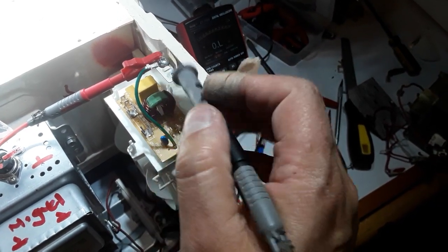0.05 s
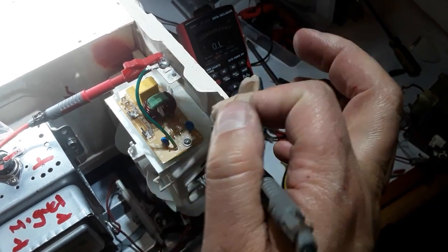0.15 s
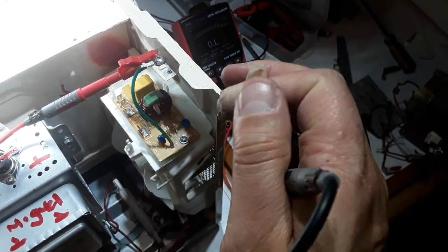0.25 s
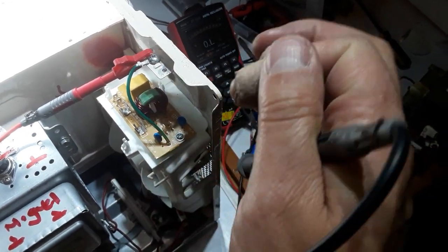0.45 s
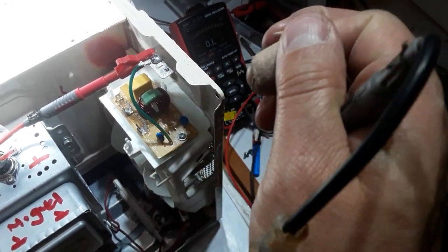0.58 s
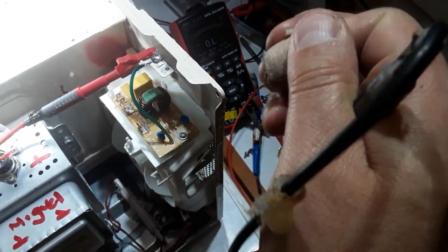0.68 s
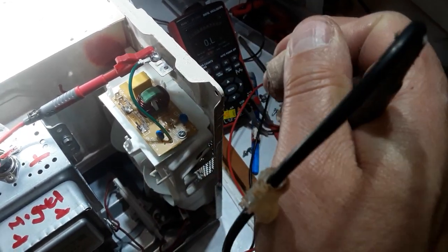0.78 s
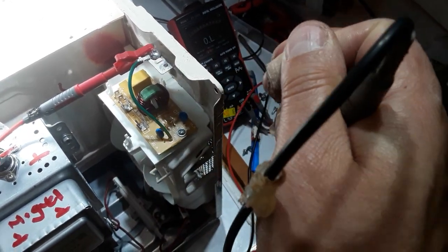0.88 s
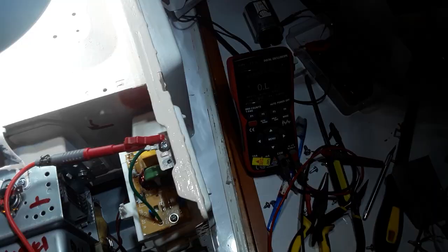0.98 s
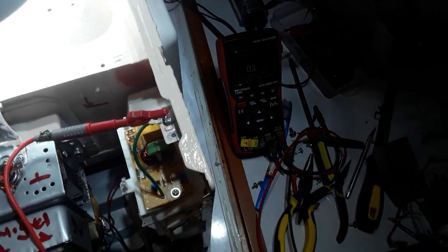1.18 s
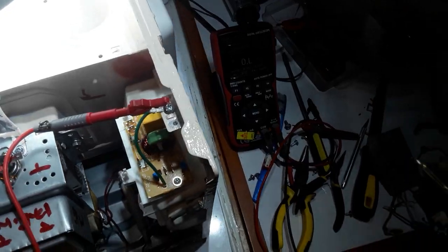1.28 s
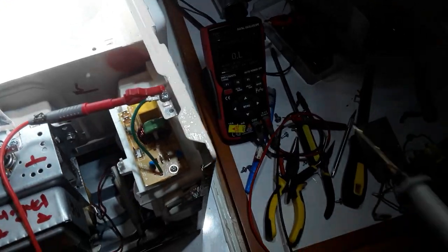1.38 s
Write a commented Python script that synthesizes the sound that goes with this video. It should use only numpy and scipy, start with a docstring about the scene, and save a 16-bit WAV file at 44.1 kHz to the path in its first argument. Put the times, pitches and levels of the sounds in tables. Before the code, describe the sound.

One sharp electrical snap with a short metallic ring, then faint handling of a lead.

```python
"""A workbench in a small room, one microphone close to an opened appliance.
One sharp electrical snap jolts the chassis and sets the sheet-metal cabinet ringing; the room's
reflections die away behind it. Then a hand draws a test lead back: faint scuffs, thin rustles, ticks,
the crackle of the stiff lead bending and a soft bump. Underneath lies quiet room tone with a thin whine."""
import sys
import numpy as np
from scipy import signal
from scipy.fft import rfft, irfft
from scipy.io import wavfile
from scipy.ndimage import uniform_filter1d

SR = 44100
rng = np.random.default_rng(int(sys.argv[2]) if len(sys.argv) > 2 else 0)


def int16_out(signal):
    """Quantize to a 16-bit WAV file."""
    q = np.round(np.clip(np.atleast_2d(signal).T, -1, 1) * 32767)
    wavfile.write(sys.argv[1], SR, q.astype(np.int16))


N = 63945
T = np.arange(N) / SR
SNAP_S = 0.2228

# Room tone at the bench. Each row: frequency in Hz, density in dB per Hz.
ROOM_TONE = [(25, -102), (50, -102.5), (80, -88.5), (140, -89.5), (300, -92.5), (600, -101), (1100, -110),
             (2000, -110), (3000, -121), (4000, -121), (5500, -128), (8100, -122), (10500, -131),
             (16000, -135)]
# Murmur of the moving arm and lead. Each row: time in seconds, level in dB.
MURMUR_LEVEL = [(0, -75), (.4, -76.5), (.6, -62), (.8, -63), (.96, -65.5), (1.02, -71.5), (1.12, -66.5),
                (1.24, -69.5), (1.32, -86), (1.45, -74)]
# Its dull spectrum. Each row: frequency in Hz, relative level in dB.
MURMUR_COLOUR = [(25, -34.5), (50, -13.5), (100, 5), (250, 2), (420, -0.5), (680, 0), (1100, -14.5),
                 (2500, -24), (5000, -43)]
# The lead sliding through the fingers. Each row: peak time in seconds, level in dB, width in seconds.
RUSTLE_SWELLS = [(.163, -69, .012), (.51, -71, 0.059), (.566, -66, .005), (.635, -76, 0.016),
                 (.70, -69, 0.015), (.76, -74.5, 0.066), (.815, -70, 0.0083), (1.11, -73.5, 0.052),
                 (1.255, -77, 0.019), (1.33, -79.5, 0.044)]
# Their thin spectrum. Each row: frequency in Hz, relative level in dB.
RUSTLE_SPECTRUM = [(2000, -34.5), (5500, -22.5), (7000, -3.5), (8100, 6), (9300, -7.5), (11000, -19),
                   (16000, -33.5)]
# The crack's resonances, then clusters of close panel rings.
# Each row: frequency in Hz, width in Hz, level in dB, rise in seconds, t60 in seconds.
CRACK_RESONANCES = [(2187, 150, -23.5, 0.004, .04), (3150, 140, -25.5, 0.0033, .045),
                    (8020, 370, -13, 0.0042, 0.019), (8400, 1300, -37.5, 0.0016, 0.054),
                    (3195, 140, -43, .002, 0.37), (4330, 250, -44.5, .002, .32),
                    (5324, 96, -49.5, .002, 0.39)]
# The cabinet's modes. Each row: frequency in Hz, level in dB, rise in seconds, t60 in seconds.
CABINET_MODES = [(104, -47, .01, .55), (167, -37, .003, .76), (203, -25, .012, .3), (243, -38, .002, .55),
                 (292, -31, .002, .12), (411, -42, .004, .45), (460, -39, .003, .4), (478, -40, .01, .4),
                 (547, -44, .005, .55), (636, -39, .003, .2), (687, -31, .007, .26), (813, -47, .004, .36),
                 (1893, -44, .002, .21), (2150, -39, .002, .19), (2364, -48, .002, .3),
                 (2946, -46, .002, .3), (3176, -38, .002, .2), (4406, -49, .002, .22),
                 (5283, -42, .002, .24), (6800, -45, .002, .19), (7750, -39, .002, .19),
                 (7897, -39, .002, .22), (8010, -37, .002, .16), (8839, -35, .002, .17)]
# The room's answer. Each row: frequency in Hz, density in dB per Hz, t60 in seconds.
REFLECTIONS = [(50.53, -89.5, 0.3), (114.3, -73.5, 0.61), (196, -65, .62), (356, -62.5, .47),
               (660, -67, 0.47), (1168, -73.5, 0.36), (2040, -71, 0.4), (3900, -77.5, .32),
               (6200, -72, 0.34), (8560, -70.5, 0.33), (10140, -81, .265), (15130, -86.5, .22)]
# Scuffs of hand and lead.
# Each row: start in seconds, level before filtering in dB, rise in seconds, t60 in seconds, top in Hz.
SCUFF_STROKES = [(0.438, -56.5, 0.0077, 0.59, 3020), (.714, -52.5, 0.0064, 0.21, 2980),
                 (1.006, -67.5, .004, 1, 12930), (1.078, -51, .01, .26, 11000)]
# Their spectrum. Each row: frequency in Hz, relative level in dB.
SCUFF_SPECTRUM = [(100, -12), (300, 2.5), (800, -0.5), (1600, -5), (3000, -16), (6000, -21), (8200, -8.5),
                  (10500, -34), (16000, -16)]
# Ticks of the lead. Each row: start in seconds, level in dB, low edge in Hz, high edge in Hz.
LEAD_TICKS = [(.439, -53, 1390, 2940), (0.561, -67, 4000, 8950), (0.716, -68, 6500, 11000),
              (.737, -62, 7400, 9900), (.749, -64, 7400, 10400), (.775, -69, 7800, 10500),
              (0.81, -57, 8300, 12000), (0.82, -58, 8000, 11900), (1.009, -68, 2000, 11900),
              (1.122, -67, 2490, 12100)]
# The lead bending. Each row: peak time in seconds, level in dB, width in seconds.
CRACKLE_SWELLS = [(.58, -89, 0.11), (.75, -76.5, 0.034), (.805, -74, 0.019), (.845, -84, .013)]
# The crackle's bright spectrum. Each row: frequency in Hz, relative level in dB.
CRACKLE_SPECTRUM = [(3000, -28.5), (6300, -29), (8300, 7), (11000, -5), (16000, -14)]
# A low drone. Each row: peak time in seconds, level in dB, width in seconds.
DRONE_SWELLS = [(.63, -62, 0.052), (.84, -61, 0.056)]


def from_db(db):
    """Decibels to gain."""
    return 10 ** (np.asarray(db) / 20)


def rms_one(x):
    """Scale to unit rms."""
    return x / np.sqrt(np.mean(x ** 2) + 1e-20)


def at_hz(points, hz, column=1):
    """Read a column of a table on a log-frequency axis."""
    rows = np.array(points)
    return np.interp(np.log(hz + 1e-9), np.log(rows[:, 0]), rows[:, column])


def band(x, low_hz, high_hz):
    """Butterworth band-pass, its top edge held below half the sample rate."""
    edges = [low_hz, min(high_hz, .45 * SR)]
    return signal.sosfilt(signal.butter(2, edges, "band", fs=SR, output="sos"), x)


def coloured(x, colour):
    """Shape a signal's spectrum by a table of Hz and dB."""
    return irfft(rfft(x) * from_db(at_hz(colour, np.fft.rfftfreq(N, 1 / SR))), N)


def noise(colour):
    """Steady noise with the given dB per Hz."""
    return coloured(rng.standard_normal(N), colour) * np.sqrt(SR / 2)


def resonant_noise(hz, width):
    """Noise in one resonance, its level evened so that a burst has a sure strength."""
    radius = np.exp(-np.pi * width / SR)
    feedback = [1, -2 * radius * np.cos(2 * np.pi * hz / SR), radius ** 2]
    x = signal.lfilter([1, 0, -1], feedback, rng.standard_normal(N))
    return x / np.sqrt(uniform_filter1d(x * x, size=int(2 * SR / width)) + 1e-12)


def tone(hz, db=0, start=0):
    """A sine that rises through zero at the start time."""
    return from_db(db) * np.sin(2 * np.pi * hz * (T - start))


def strike(start, rise, t60):
    """Envelope that rises quickly and dies by 60 dB in t60 seconds."""
    live = slice(int(np.ceil(start * SR)), int((start + 2 * t60) * SR))
    out, age = np.zeros(N), T[live] - start
    out[live] = (1 - np.exp(-age / max(rise, 1e-5))) * np.exp(-np.log(1000) * age / t60)
    return out


def swells(rows):
    """Sum of bell-shaped swells, each given as peak time, dB and width."""
    return sum(from_db(db) * np.exp(-.5 * ((T - peak) / width) ** 2) for peak, db, width in rows)


def room_tone(whine_fade_db_per_s=9):
    """Quiet room noise, a thin electrical whine and a low hum already fading at the start."""
    whine = tone(hz=1981, db=-79 - whine_fade_db_per_s * T)
    hum = tone(hz=135, db=-56) * strike(0, rise=0, t60=.35)
    return noise(ROOM_TONE) + whine + hum


def arm_murmur():
    """The moving arm and lead make a dull noise that comes and goes."""
    level_db = np.interp(T, *np.transpose(MURMUR_LEVEL))
    return rms_one(noise(MURMUR_COLOUR)) * from_db(level_db)


def lead_rustles(grain_db=3.5, grains_per_s=300):
    """The lead slides through the fingers with a thin, grainy hiss."""
    flicker = rms_one(uniform_filter1d(rng.standard_normal(N), size=int(SR / grains_per_s)))
    hiss = noise(RUSTLE_SPECTRUM) * from_db(grain_db * flicker)
    return rms_one(hiss) * swells(RUSTLE_SWELLS)


def crack():
    """The electrical snap, close up: a broad spit, brief bright resonances and a metallic after-ring."""
    spit = from_db(-41) * rng.standard_normal(N) * strike(SNAP_S, rise=0, t60=.1)
    return spit + sum(from_db(db) * resonant_noise(hz, width) * strike(SNAP_S, rise, t60)
                      for hz, width, db, rise, t60 in CRACK_RESONANCES)


def cabinet():
    """The chassis jolts and the metal panels ring, the low modes beating against each other."""
    jolt = tone(hz=230, db=-21, start=SNAP_S) * strike(SNAP_S, rise=.004, t60=.035)
    ring = sum(tone(hz, db, SNAP_S) * strike(SNAP_S, rise, t60) for hz, db, rise, t60 in CABINET_MODES)
    late_mode = tone(hz=242.3, start=SNAP_S) * swells([(.318, -34, .03)])
    return band(jolt + ring + late_mode, 90, SR / 2)   # the jolt and ring are held above 90 Hz


def room_reflections(rise_s=.0015, rise_cycles=.99):
    """The snap comes back off the walls; each half octave dies at its own rate, the lows building later."""
    spectrum = rfft(noise(REFLECTIONS))
    hz = np.fft.rfftfreq(N, 1 / SR)
    edges_hz = 40 * 2 ** np.arange(0, 9.5, .5)
    out = np.zeros(N)
    for low, high in zip(edges_hz, edges_hz[1:]):
        centre = np.sqrt(low * high)
        envelope = strike(SNAP_S, rise_s + rise_cycles / centre, at_hz(REFLECTIONS, centre, column=2))
        out += irfft(spectrum * ((hz >= low) & (hz < high)), N) * envelope
    return out


def scuffs(low_hz=70):
    """Hand and lead rub in strokes that start quickly and trail off."""
    rub = rms_one(noise(SCUFF_SPECTRUM))
    return sum(from_db(db) * band(rub, low_hz, top_hz) * strike(start, rise, t60)
               for start, db, rise, t60, top_hz in SCUFF_STROKES)


def lead_ticks():
    """The lead ticks in the hand, each tick a small dry burst of noise."""
    white = rng.standard_normal(N)
    return sum(from_db(db) * rms_one(band(white, low, high)) * strike(start, rise=0, t60=.017)
               for start, db, low, high in LEAD_TICKS)


def lead_crackle(clicks_per_s=490, spread_db=3):
    """The stiff lead bends and gives off runs of tiny, bright random clicks."""
    sizes = rng.choice([-1, 1], N) * from_db(spread_db * rng.standard_normal(N))
    clicks = sizes * (rng.random(N) < clicks_per_s / SR)
    return rms_one(coloured(clicks, CRACKLE_SPECTRUM)) * swells(CRACKLE_SWELLS)


def drone(hz=76, width_hz=6.9):
    """A low, narrow band of noise swells twice."""
    rumble = band(resonant_noise(hz, width_hz), hz / np.sqrt(2), hz * np.sqrt(2))
    return rumble * swells(DRONE_SWELLS)


def hand_bump():
    """A soft bump of the hand, gone within a few cycles."""
    start = 1.4215
    return tone(hz=510, db=-45, start=start) * strike(start, rise=0, t60=.0059)


def scene():
    """At the bench, in mono: the snap with its ring and room, and the handling, over room tone."""
    snap = crack() + cabinet() + room_reflections()
    lead = lead_rustles() + scuffs() + lead_ticks() + lead_crackle()
    return (snap + lead + arm_murmur() + drone() + hand_bump() + room_tone())[None]


def record(dry):
    """The microphone's signal is cut steeply at the top."""
    cutoff_hz = 15800
    return signal.sosfilt(signal.ellip(12, .1, 80, cutoff_hz, fs=SR, output="sos"), dry)


dry = scene()
out = record(dry)
int16_out(out)
```